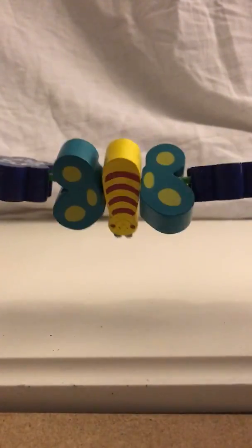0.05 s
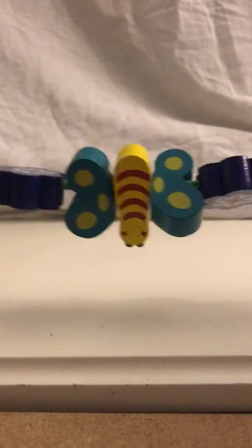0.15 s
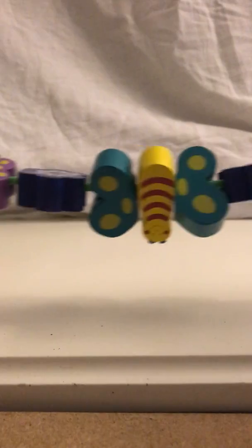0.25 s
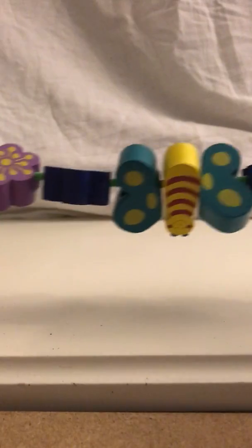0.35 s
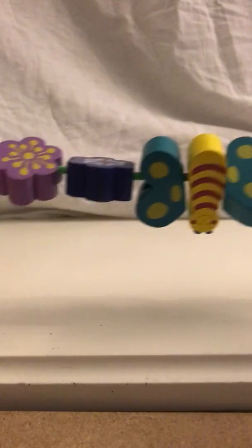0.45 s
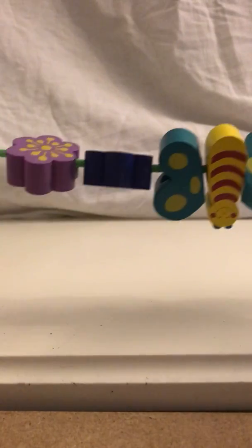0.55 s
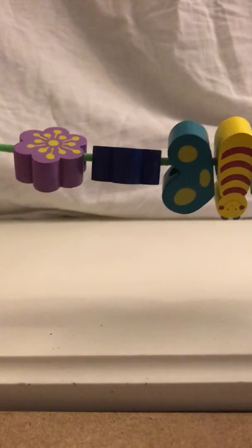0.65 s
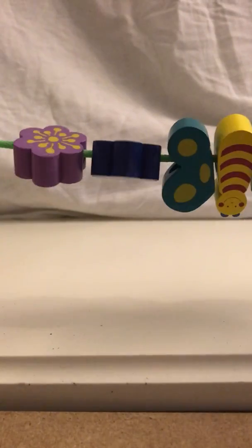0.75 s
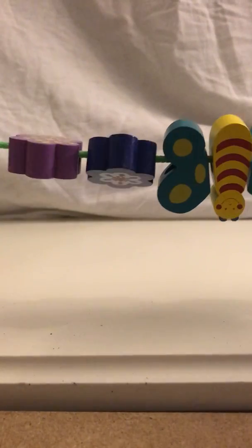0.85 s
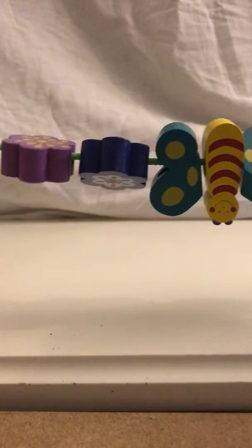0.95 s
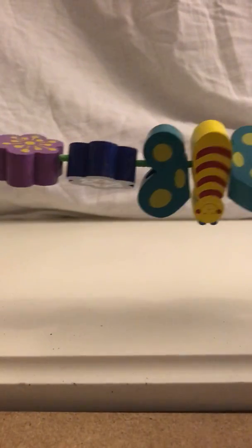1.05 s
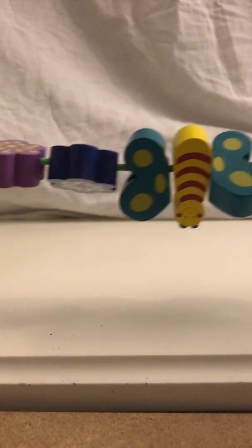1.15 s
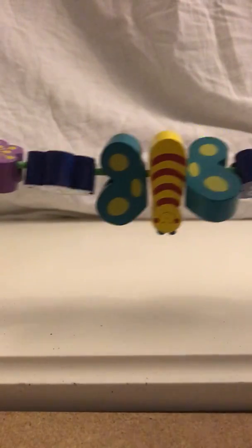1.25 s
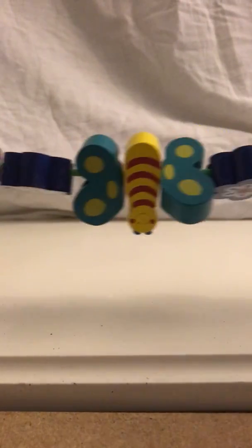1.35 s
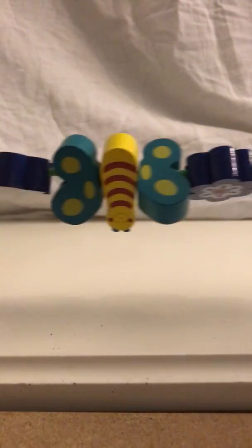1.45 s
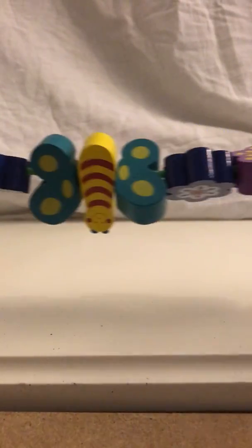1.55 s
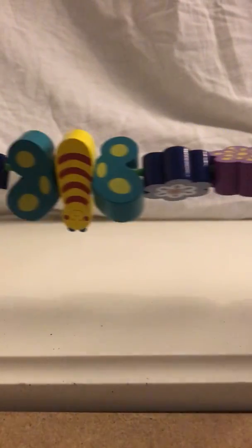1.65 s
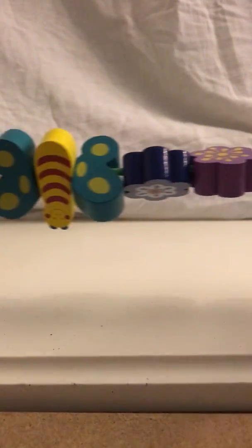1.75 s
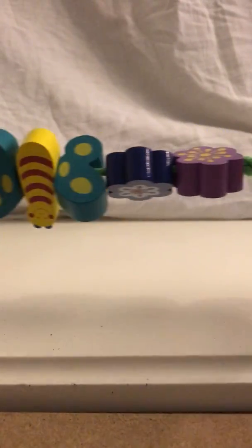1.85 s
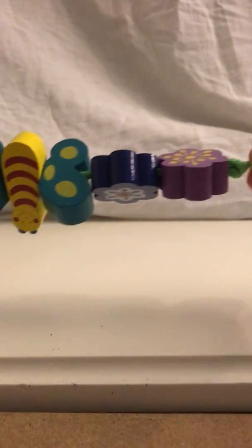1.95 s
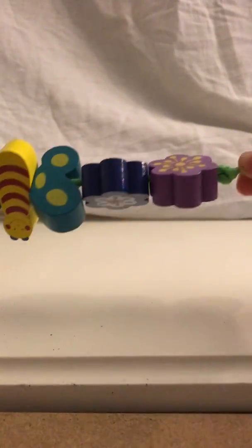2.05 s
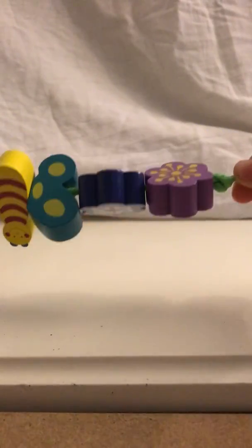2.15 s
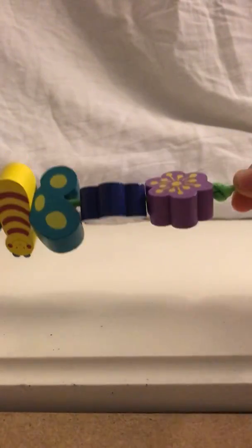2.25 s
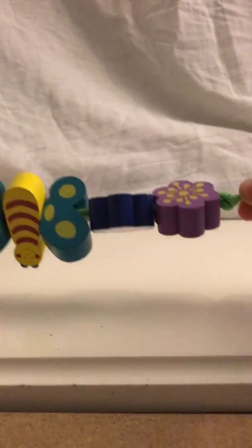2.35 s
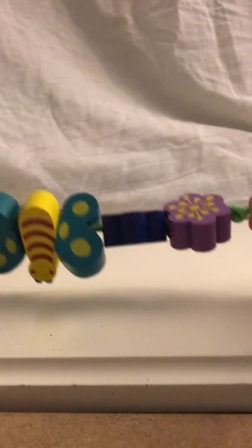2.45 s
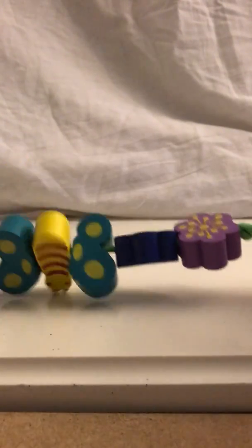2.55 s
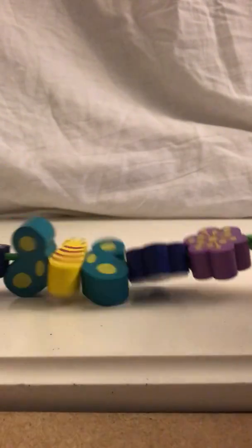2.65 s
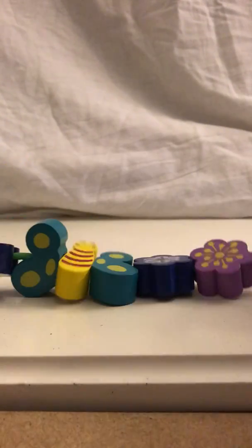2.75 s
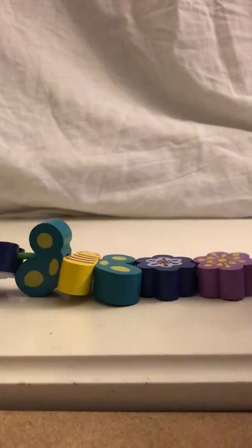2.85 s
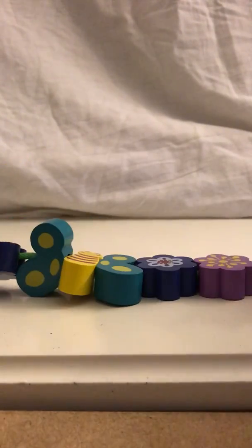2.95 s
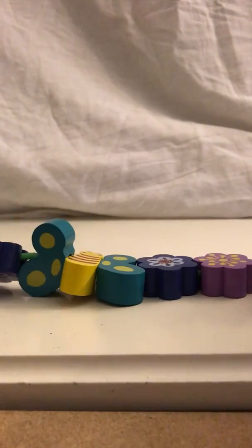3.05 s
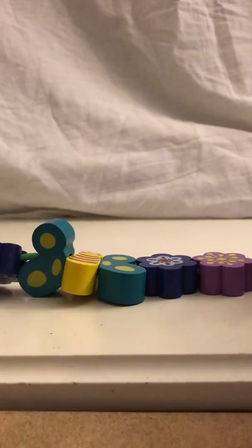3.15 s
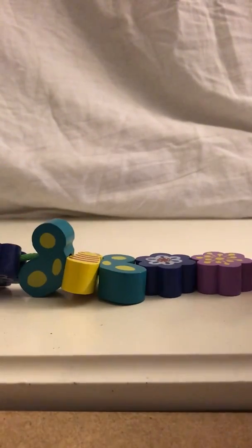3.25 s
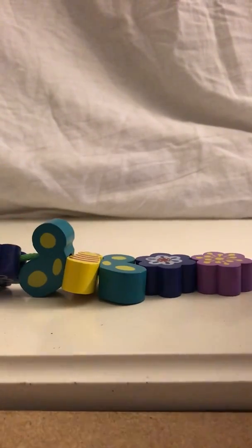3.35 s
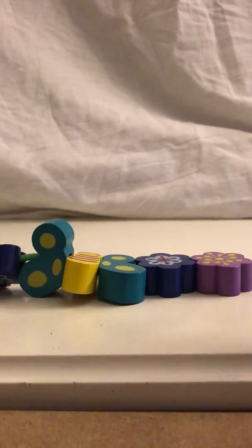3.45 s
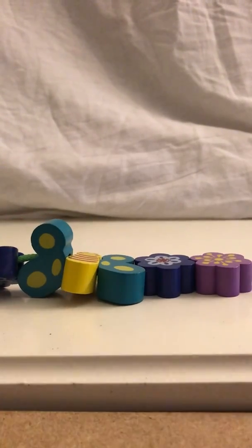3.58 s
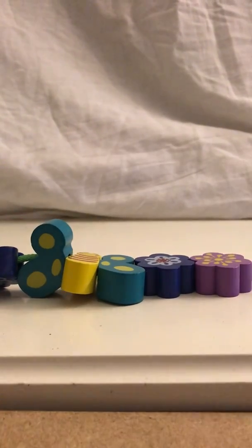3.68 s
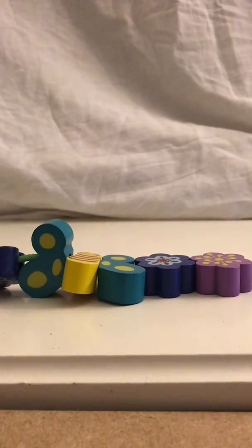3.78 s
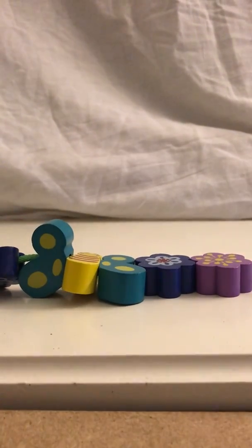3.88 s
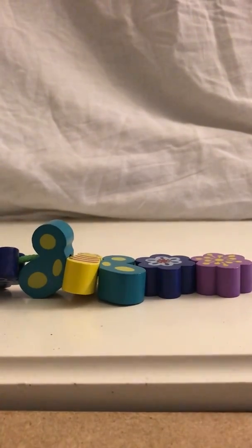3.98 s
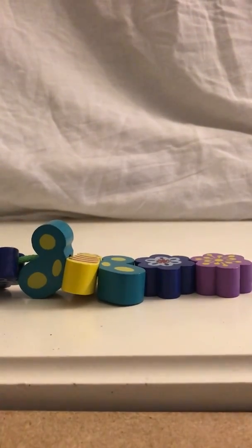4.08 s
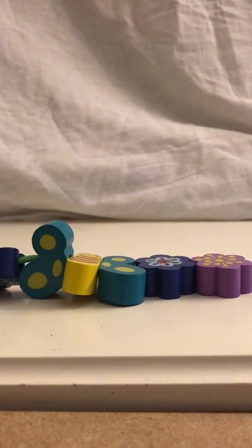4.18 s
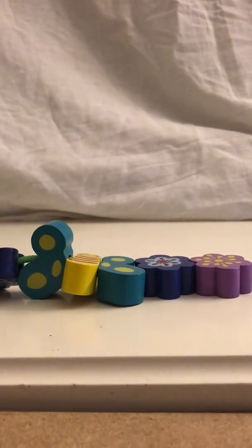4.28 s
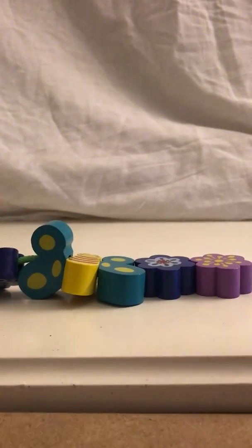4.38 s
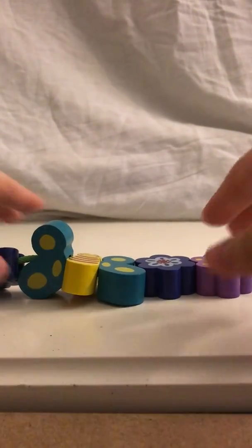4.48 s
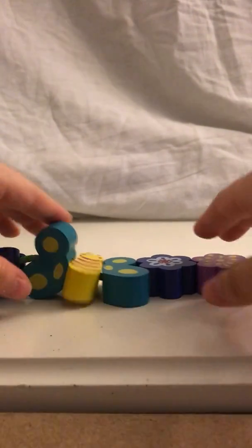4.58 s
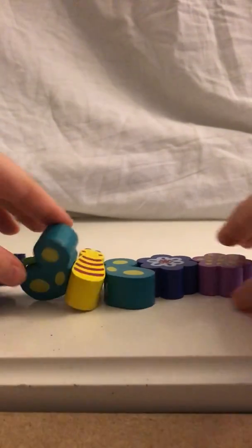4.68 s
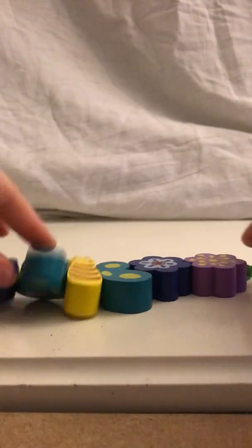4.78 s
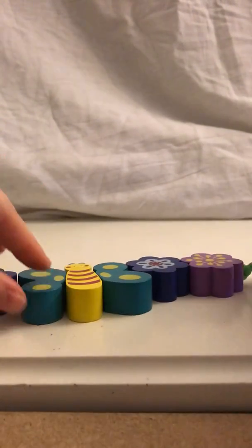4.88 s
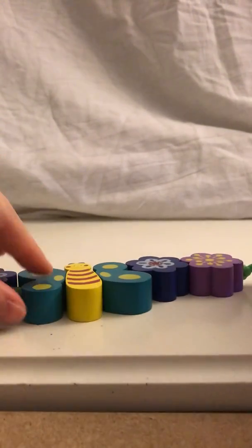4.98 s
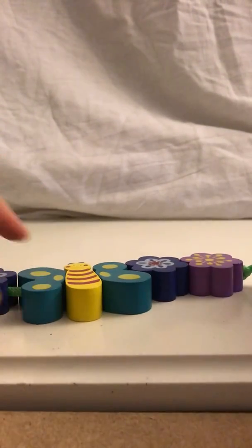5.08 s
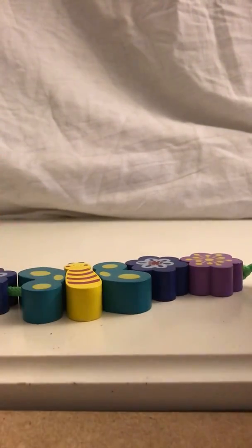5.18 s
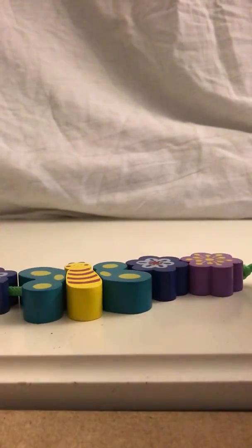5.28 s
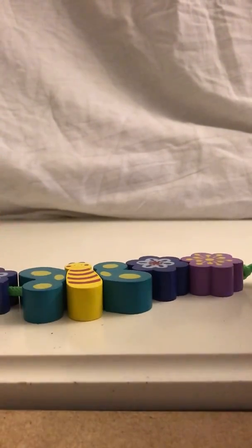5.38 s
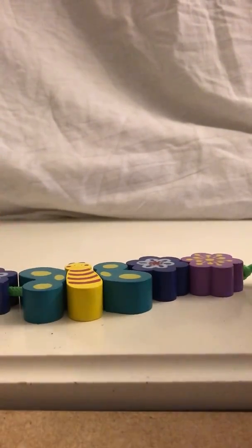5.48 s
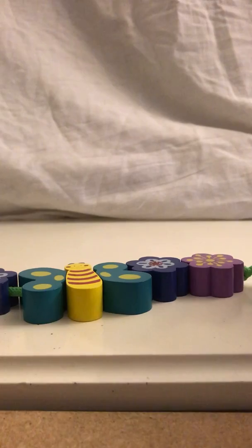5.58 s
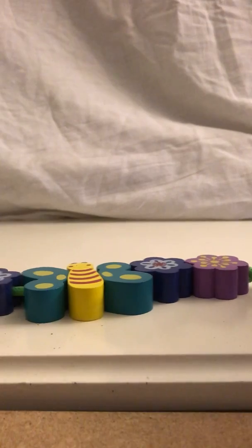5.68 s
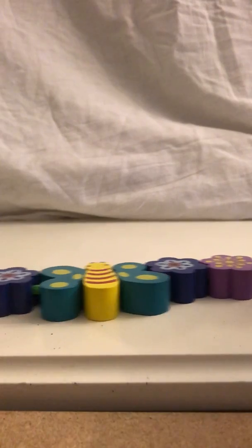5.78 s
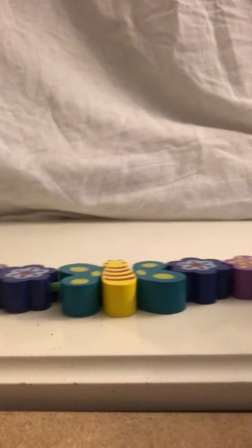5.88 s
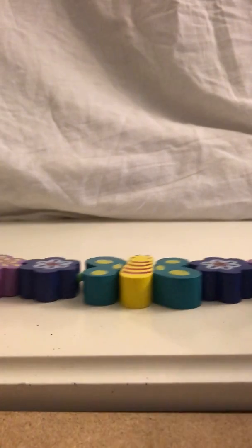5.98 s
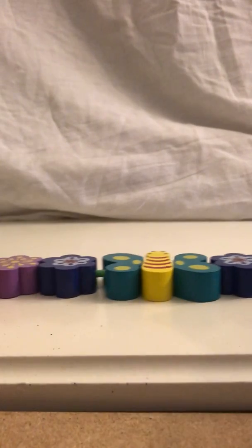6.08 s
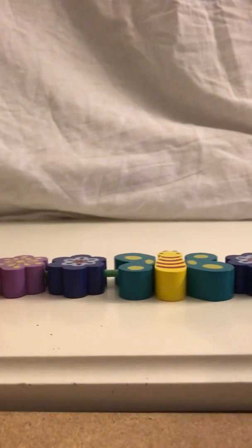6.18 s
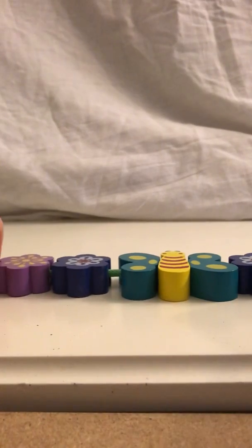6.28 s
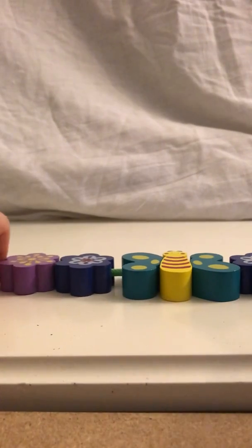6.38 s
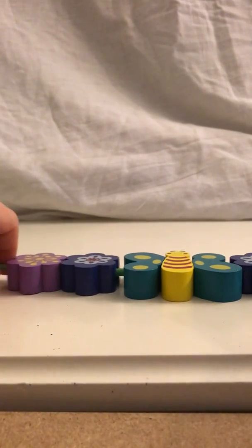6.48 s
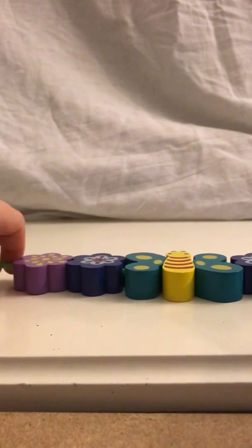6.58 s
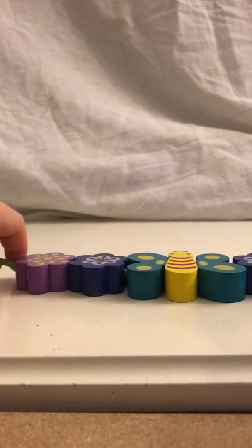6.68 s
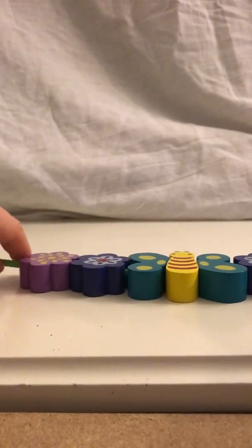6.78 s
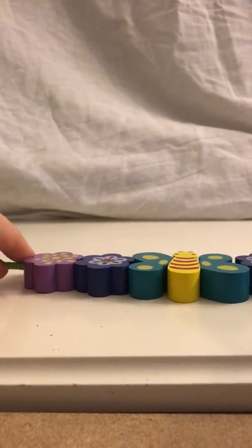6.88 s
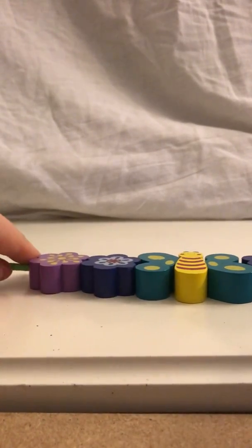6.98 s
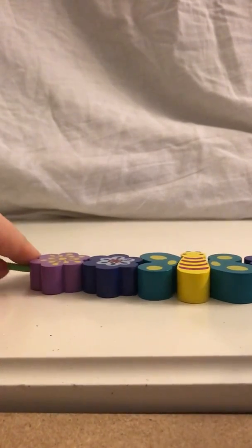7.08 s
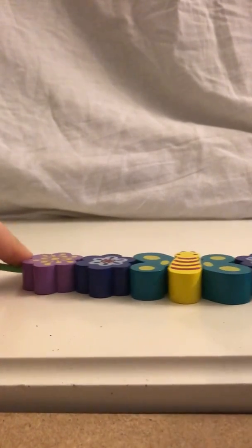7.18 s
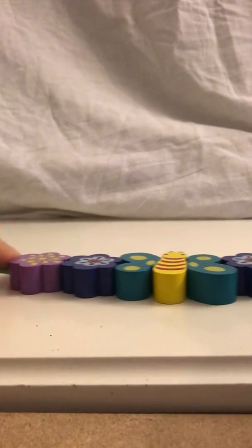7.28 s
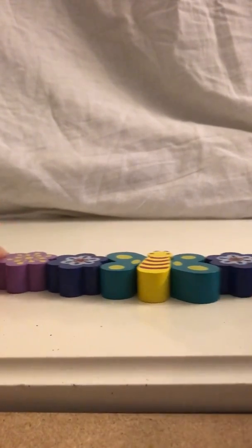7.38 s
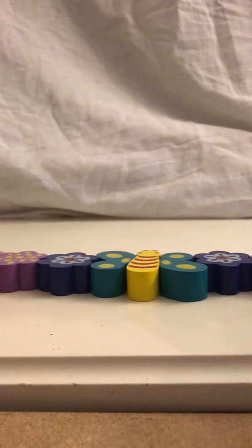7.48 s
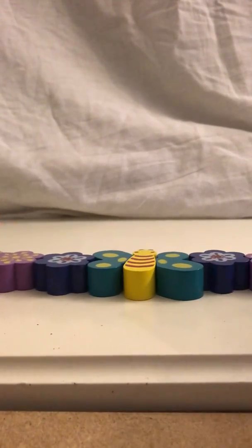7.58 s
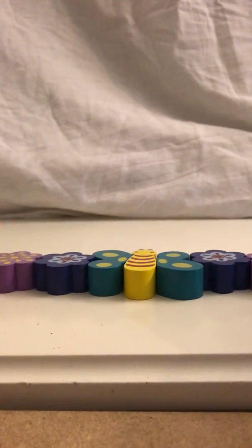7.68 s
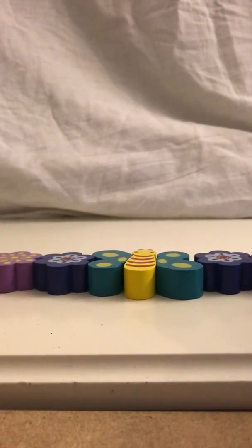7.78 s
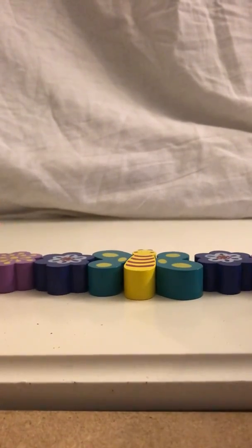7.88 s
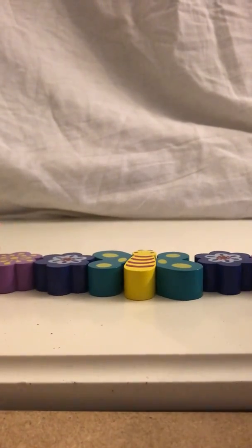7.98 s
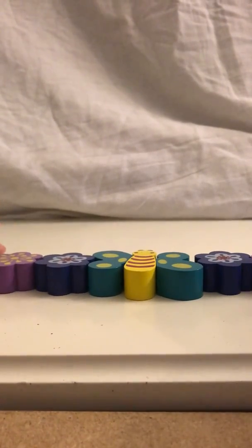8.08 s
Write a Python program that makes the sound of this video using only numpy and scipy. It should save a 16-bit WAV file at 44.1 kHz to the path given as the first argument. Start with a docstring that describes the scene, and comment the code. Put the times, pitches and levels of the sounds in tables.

```python
"""A small room: wooden beads on a cord are laid on a painted board, one tips over and clacks down,
then the string is slid along and fingered. Blows excite damped modes of board and bead (modal synthesis),
drags and brushing are filtered grainy noise, and the room answers the blows with a diffuse tail.
Behind them: swelling room rumble, a low hum that comes and goes, microphone hiss, a brighter hiss after
the loudest clack that ends abruptly, and a faint regular flicker in the treble."""
import sys
import numpy as np
from scipy import signal
from scipy.fft import rfft, irfft, next_fast_len
from scipy.io import wavfile
from scipy.ndimage import map_coordinates

SR = 44100
rng = np.random.default_rng(int(sys.argv[2]) if len(sys.argv) > 2 else 0)


def log_audio(samples):
    """Write samples as a 16-bit WAV file to the path given in sys.argv[1]."""
    # one column per channel
    frames = np.atleast_2d(samples).T
    # limit to full scale, then quantise
    limited = np.clip(frames, -1, 1)
    pcm = np.round(limited * 32767).astype(np.int16)
    wavfile.write(sys.argv[1], SR, pcm)


def voltage_ratio(level):
    """Linear amplitude factor for a level in decibels (scalar or array-like)."""
    return 10 ** (np.asarray(level, float) / 20)


N = 359018  # samples


def unit(x):
    """Normalisation: scales a signal to rms 1."""
    return x / np.sqrt(np.mean(x ** 2) + 1e-20)


def along(points, hz):
    """Linear interpolation of (f/Hz, value) points on a logarithmic frequency axis."""
    f, value = np.transpose(points)
    return np.interp(np.log(hz + 1), np.log(f + 1), value)


def curves(rows):
    """Linear interpolation in time: one curve for each column after t/s."""
    t, *columns = np.transpose(rows)
    return [np.interp(np.arange(N) / SR, t, c) for c in columns]


def wobble(rate):
    """Slow random modulation: a smooth curve through rate random knots a second."""
    knots = rng.standard_normal(int(N * rate / SR) + 4)
    return map_coordinates(knots, [np.arange(N) * rate / SR])


def filtered(x, response):
    """Linear filtering: the spectrum is multiplied by a complex response of frequency."""
    m = next_fast_len(len(x) + 8192)
    return irfft(rfft(x, m) * response(np.fft.rfftfreq(m, 1 / SR)), m)[:len(x)]


def modes(table, scatter_db=0, sign=-1):
    """Modal superposition: damped resonances (f/Hz, width/Hz, level/dB), mode k weighted by sign ** k."""
    gains = [voltage_ratio(db + scatter_db * rng.standard_normal()) for _, _, db in table]

    def response(f):
        total = 0
        for k, (gain, (centre, width, _)) in enumerate(zip(gains, table)):
            damping = 1j * f * width
            total = total + sign ** k * gain * damping / (centre * centre - f * f + damping)
        return total
    return response


def soft(response, edge_hz):
    """Contact stiffness: a rounded contact excites ever less of what lies above edge_hz."""
    return lambda f: response(f) / (1 + 1j * f / edge_hz) ** 2


def noise(response, source=None):
    """Spectral shaping: coloured noise of rms 1."""
    source = rng.standard_normal(N) if source is None else source
    return unit(filtered(source, response))


def struck(response, contact_s, rough):
    """Impulse excitation: one sharp push, and chatter falling 60 dB in contact_s, ring a body; peak 1."""
    t = np.arange(SR // 6) / SR
    chatter = voltage_ratio(-60 * t / contact_s) * rng.standard_normal(len(t))
    force = (t == 0) + rough * chatter
    ring = filtered(force, response)
    return ring / np.abs(ring).max()


def stroke(rows):
    """Envelope following: gain through (t/s, level/dB) points, zero outside them."""
    t, db = np.transpose(rows)
    return np.interp(np.arange(N) / SR, t, voltage_ratio(db), 0, 0)


def strokes(rows, attack_s, release_s, fade_db=0, axis=2):
    """Amplitude envelopes: motions rise, sag by fade_db while they last, and let go; the largest wins."""
    t, gain = np.arange(N) / SR, np.zeros(N)
    for row in rows:
        start, end = row[0], row[0] + max(row[1], 2.4 * attack_s)
        shape = np.interp(t, [start, start + attack_s, end, end + release_s], [0, 1, voltage_ratio(-fade_db), 0])
        gain = np.maximum(gain, voltage_ratio(row[axis]) * shape)
    return gain


def add(out, s, x):
    """Superposition: mixes x in from time s."""
    out[round(s * SR):][:len(x)] += x


# Reverberation time of the room: f/Hz, t60/s
REVERBERATION = [(100, .4), (500, 0.41), (2000, 0.37), (5000, 0.29), (8000, 0.16), (12000, 0.077)]


def echo(x):
    """Diffuse reverberation: a new noise tail, in which each frequency decays at its own rate."""
    hz, t, z = signal.stft(rng.standard_normal(SR // 2), SR, nperseg=256)
    decay = voltage_ratio(-60 * t / along(REVERBERATION, hz)[:, None])
    tail = signal.istft(z * decay, SR, nperseg=256)[1]
    delayed = np.pad(tail / np.linalg.norm(tail), (130, 0))  # samples before the tail begins
    return signal.fftconvolve(x, delayed)


def add_in_room(out, s, x, echo_db):
    """Direct and reverberant field: x from time s, with its tail at echo_db."""
    add(out, s, x)
    add(out, s, voltage_ratio(echo_db) * echo(x))


# Rumble spectrum: f/Hz, relative level per Hz/dB
RUMBLE_SPECTRUM = [(12, -32.5), (20, -9.5), (70, 1), (102, -11), (123, -3), (177, -13), (217, -3.5),
                   (258, -12), (296, -9), (500, -23.5), (650, -54), (1100, -120)]
# Rumble, louder while the board is handled, before a slight random wobble: t/s, rms level/dB
RUMBLE_LEVEL = [(0, -65), (1.6, -64), (2.65, -61.5), (2.75, -51.5), (2.87, -49.5), (2.99, -56.5),
                (3.22, -48), (3.6, -53), (3.87, -53), (4.08, -56.5), (4.76, -58.5), (4.88, -53), (5.1, -59),
                (5.9, -57.5), (6.5, -56), (7.44, -59.5), (7.8, -55), (8.14, -65.5)]


def rumble():
    """Low-frequency noise shaping: room rumble that swells."""
    level_db, = curves(RUMBLE_LEVEL)
    return voltage_ratio(level_db + 1.1 * wobble(8)) * noise(lambda f: voltage_ratio(along(RUMBLE_SPECTRUM, f)))


# Swells of the hum, before its random wobble: start t/s, length/s (at least 0.312 s is played), level/dB
HUM_SWELLS = [(-.1, .8, -58.5), (1.5, .45, -67), (2.82, .25, -56), (3.27, .1, -57), (3.53, .17, -50),
              (3.98, .45, -64.5), (4.6, .3, -52.5), (5.56, .16, -65), (5.9, .1, -62.5), (6.19, .12, -57),
              (6.47, .1, -59.5), (6.74, .35, -60.5), (7.5, .75, -54)]


def hum():
    """Frequency and amplitude modulation: a low sine near 69 Hz wavers in pitch and comes and goes."""
    swell = voltage_ratio(-76) + strokes(HUM_SWELLS, attack_s=0.13, release_s=0.1)  # faint between swells
    hz = 69 + 1.8 * wobble(4.4)
    return np.sin(2 * np.pi * np.cumsum(hz) / SR) * swell * voltage_ratio(2.5 * wobble(7.9))


# Hiss spectrum: f/Hz, relative level per Hz/dB
HISS_SPECTRUM = [(180, -31), (300, -5.5), (366, -9), (446, -10), (745, -10.5), (850, -11.5), (923, -11.5),
                 (1590, -12), (2180, -20.5), (2990, -20), (4820, -25.5), (9660, -30), (10500, -32.5),
                 (12600, -27), (15600, -30)]


def hiss():
    """Random noise: smooth microphone hiss with a slow, slight change of level."""
    return voltage_ratio(-68.5 + 0.98 * wobble(0.41)) * noise(lambda f: voltage_ratio(along(HISS_SPECTRUM, f)))


# Brighter hiss after the loudest clack, which stops at once: t/s, rms level/dB
BRIGHT_HISS = [(4.98, -58), (5.1, -63), (5.25, -66.5), (5.372, -66.5), (5.378, -92)]


def bright_hiss():
    """Band-limited noise: first-order slopes below 1500 Hz and above 6000 Hz."""
    band = noise(lambda f: 1j * f / (1500 + 1j * f) / (1 + 1j * f / 6000))
    return stroke(BRIGHT_HISS) * band


def flicker():
    """Periodic amplitude modulation: treble noise makes a regular, very faint tick."""
    period_s, first_s, decay_s = 0.1024, 0.0575, 0.02  # decay_s: fall by 60 dB
    since = (np.arange(N) / SR - first_s) % period_s
    return voltage_ratio(-68.5 + 2.5 * wobble(5.6) - 60 * since / decay_s) * noise(modes([(11000, 8800, 0)]))


# Fingers and cord brushing: start t/s, length/s, level at onset/dB
BRUSHES = [(5.75, 0.34, -74), (6.52, .13, -73.5), (6.72, .05, -74), (6.82, .09, -74.5), (7.17, 0.064, -75),
           (7.29, .04, -68), (7.35, 0.077, -75), (7.5, .11, -78.5), (7.72, .1, -72)]


def brush():
    """Friction noise: skin on cord makes a thin crackly rustle high up."""
    grains = rng.standard_normal(N) * voltage_ratio(6.1 * wobble(250) + 1.6 * wobble(25))
    gain = strokes(BRUSHES, attack_s=0.013, release_s=0.065, fade_db=1)
    return gain * noise(modes([(14020, 2500, -4.5), (4940, 4400, -7.5)]), grains)


# Modes of the painted board: f/Hz, width/Hz, relative level/dB
BOARD_MODES = [(470, 150, -6.5), (656, 100, -5), (890, 140, -5), (1199, 77, 1.5), (1555, 110, -0.5),
               (1734, 180, -2), (2038, 130, 0), (2500, 220, -9.5), (2900, 400, -14)]


def board(edge_hz, scatter_db=0, first=0):
    """Plate resonance: the board's modes from row first up, driven through a soft contact."""
    return soft(modes(BOARD_MODES[first:], scatter_db), edge_hz)


# Beads dragged over the paint: start t/s, length/s, rub level at onset/dB, scrape level at onset/dB
DRAGS = [(4.67, 0.042, -57.5, -62.5), (4.87, 0.046, -58, -61.5), (5.5, .1, -64, -71),
         (5.85, 0.15, -55.5, -64.5), (6.014, 0.17, -53, -54.5), (6.21, 0.1, -61.5, -75.5),
         (6.58, 0.11, -64.5, -74), (7.21, 0.061, -60.5, -77), (7.3, 0.28, -59, -70.5)]


def slides():
    """Friction excitation: the paint's grain drives the board, as a dull rub and a brighter scrape."""
    grains = rng.standard_normal((2, N)) * voltage_ratio(2.5 * wobble(400) + 0.7 * wobble(30))
    rub = noise(soft(modes([(497, 810, 0)]), edge_hz=1300), grains[0])
    upper_board, bright = board(edge_hz=4300, first=3), modes([(3300, 2000, 0)])
    scrape = noise(lambda f: upper_board(f) + voltage_ratio(-24.5) * bright(f), grains[1])
    motion = dict(attack_s=0.006, release_s=0.061, fade_db=3)
    return strokes(DRAGS, **motion) * rub + strokes(DRAGS, **motion, axis=3) * scrape


# Faint ticks of fingers, cord and beads: t/s, crack peak level/dB, crack f/Hz,
# treble drive/dB (14.5 dB is added), board peak re crack peak/dB (2.5 dB is taken off)
FAINT_TICKS = [(0.0694, -57, 3340, -23, -6), (0.2583, -50, 3630, -10, -20), (0.38, -51, 3800, -24, -21),
               (3.153, -54, 3550, -10, -8), (3.1695, -51, 4150, -14, -17),
               (4.6864, -38, 3660, -17.5, -14.5), (5.588, -34, 3040, -27, -7),
               (5.8436, -51, 4220, -13.5, 2), (6.021, -52.5, 3500, -20, 9.5),
               (6.1577, -48.5, 3420, -26, -0.5), (6.4015, -41, 5380, -21, -6),
               (6.4519, -44, 5070, -29.5, -5.5), (6.4802, -42.5, 5380, -30, -13),
               (6.4988, -43, 4100, -30, -9), (6.5145, -45.5, 5380, -33, -5.5),
               (6.5992, -49, 3380, -19.5, -1), (6.6302, -44.5, 4050, -24, -24),
               (6.6386, -47.5, 3860, -13, -21), (6.6471, -48, 3780, -26, -19),
               (6.7055, -52, 4500, -25, -17), (6.728, -54, 3740, -21, -23), (6.7363, -39.5, 5360, -15, -26),
               (6.7544, -49, 4460, -25, -18), (6.8286, -48.5, 8570, -21.5, -17),
               (6.8477, -47.5, 5770, -14.5, -10.5), (6.8982, -43.5, 8480, -27.5, -30),
               (6.9937, -51, 5660, -9, -3.5), (7.1218, -48, 6260, -18, -15),
               (7.1508, -40.5, 3800, -19, -22), (7.1894, -38.5, 3810, -25.5, -14.5),
               (7.22, -45, 3100, -18, -8), (7.2314, -49.5, 3400, -16, -20), (7.3066, -43, 5720, -17, -17),
               (7.3172, -45.5, 3460, -16, -15), (7.3657, -42, 4500, -8.5, -12),
               (7.4011, -49, 6100, -13, -8), (7.5242, -47, 5370, -20, -15), (7.562, -58, 3340, -2, -2),
               (7.5954, -45.5, 3680, -10, -17), (7.6984, -48.5, 3445, -7, -3),
               (7.735, -53, 8660, -16, -21.5), (7.7553, -51.5, 3560, -16.5, -11),
               (7.7756, -47, 3460, -12, -20.5), (7.827, -49.5, 3790, -6, -19.5)]


def ticks():
    """Weak impact: tiny cracks with a bright top, each with its own share of board sound,
    from slight to louder than the crack."""
    out = np.zeros(N + SR)
    for s, db, hz, top_db, board_db in FAINT_TICKS:
        crack = modes([(hz, hz / 1.4, 0)])
        top = modes([(14300, 3500, top_db + 14.5)])
        tick = struck(lambda f: crack(f) ** 2 + top(f), contact_s=0.0049, rough=0.29)
        upper_board = board(edge_hz=2600, scatter_db=4.0, first=3)
        wood = struck(upper_board, contact_s=0.02003, rough=0.16)
        add_in_room(out, s, voltage_ratio(db) * (tick + voltage_ratio(board_db - 2.5) * wood), echo_db=-12.5)
    return out[:N]


def rattle(count=40):
    """Random impact train: the string settles in chance touches that tend to weaken."""
    start_s, length_s, peak_db, fade_db = 2.66, 0.27, -37.5, 8.5
    when, size = rng.random((count, 2)).T
    taps = np.zeros(SR // 2)
    taps[(when * length_s * SR).astype(int)] = voltage_ratio(-fade_db * when - 6.9 * size)
    wood = board(edge_hz=2400)
    bead = soft(modes([(2750, 1100, -5)]), edge_hz=7700)  # a broad, dull bead resonance
    touches = filtered(taps, lambda f: wood(f) + bead(f))
    touches = voltage_ratio(peak_db) * touches / np.abs(touches).max()
    out = np.zeros(N + SR)
    add_in_room(out, start_s, touches, echo_db=-9)
    return out[:N]


# Beads that rebound free and ring on: t/s, peak level/dB, f/Hz
FREE_RINGS = [(4.9338, -13, 7460), (4.9425, -19.5, 7400), (4.9712, -14.5, 8260), (5.7779, -54, 5750)]


def rings():
    """Free vibration: a rebounding bead rings on in one lightly damped mode (Q 14, applied twice)."""
    out = np.zeros(N + SR)
    for s, db, hz in FREE_RINGS:
        mode = modes([(hz, hz / 14, 0)])
        ring = voltage_ratio(db) * struck(lambda f: mode(f) ** 2, contact_s=0.0031, rough=0.2)
        add_in_room(out, s, ring, echo_db=-12.5)
    return out[:N]


# Slow bending modes of the board: f/Hz, width/Hz, relative level/dB
BENDING_MODES = [(92, 26, -2), (119.7, 16, -2.5), (190.7, 18, -2.5), (325, 20, -9), (380, 40, -9),
                 (438, 85, -7.5)]


def thump(db):
    """Flexural vibration: a blow bends the whole board."""
    bending = soft(modes(BENDING_MODES, scatter_db=3.5), edge_hz=1900)
    return voltage_ratio(db) * struck(bending, contact_s=0.004, rough=0.02)


# Modes of a bead: f/Hz, width/Hz, level before a factor 0.89 more for each row/dB
BEAD_MODES = [(3300, 1000, 16.5), (3800, 340, 0), (5600, 750, 10), (7020, 100, 5), (8960, 210, 3.5),
              (12190, 1900, 7.5)]


def snap(db, hz):
    """Damped impact: a pressed bead cracks and stops at once; hard blows crack over the whole treble."""
    crack = modes([(hz, hz / 1.4, 0)])
    bead = modes(BEAD_MODES, scatter_db=3.0, sign=0.89)
    spread = voltage_ratio(1.5 + 0.35 * db)
    snapped = lambda f: (crack(f) ** 2 + spread * 1j * f / (2500 + 1j * f)) * (1 + bead(f))
    return voltage_ratio(db) * struck(snapped, contact_s=0.01, rough=0.21)


# Beads meeting the board or each other:
# t/s, board peak level/dB, snap peak level/dB, thump peak level/dB, snap f/Hz
BLOWS = [(2.6328, -22, -41, -32, 9300), (2.6588, -21.5, -40.5, -33.5, 3930), (2.6806, -23, -51, -31, 4010),
         (2.6983, -22.5, -29.5, -33.5, 4140), (2.7206, -25, -50, -37.5, 3490),
         (2.7456, -34, -60, -36, 4120), (2.783, -28.5, -43, -48, 3630), (2.8002, -25.5, -31.5, -48, 3030),
         (2.8095, -28.5, -42, -68, 3230), (2.835, -40, -37.5, -55, 4020), (2.8458, -30, -62, -58, 4180),
         (2.8646, -35, -54, -60, 3320), (2.8761, -43, -44, -63, 3300), (2.8856, -41, -40.5, -57, 3920),
         (2.8967, -43, -53, -56.5, 3250), (3.091, -44.5, -71, -61, 3850), (3.116, -44, -67, -57, 3810),
         (3.1308, -47, -59, -43, 4230), (3.2353, -45, -64, -50, 3100), (3.2669, -20.5, -15.5, -25.5, 5600),
         (3.2944, -34.5, -26.5, -53, 5540), (3.373, -44.5, -49.5, -56, 3530),
         (3.443, -47.5, -64, -53, 3770), (3.6546, -43.5, -50, -52, 3430), (3.667, -47, -52, -63, 3020),
         (4.679, -48, -55, -56.5, 3253), (4.7476, -52, -63, -56, 5290), (4.9109, -23.5, -13.5, -37.5, 4300),
         (4.916, -28, -35.5, -42, 3830), (4.9213, -33, -28, -40.5, 3940), (4.9287, -19, -4, -39, 6256),
         (4.9331, -18, -2, -29, 7547), (4.9381, -21, -14, -38.5, 3640), (4.9441, -26, -20, -33, 5000),
         (4.969, -27, -18, -45, 4340), (4.9711, -27, -10, -39.5, 6500), (5.7682, -43, -56, -48.5, 3120),
         (5.7779, -47, -51, -54, 3060)]


def knocks():
    """Impact excitation: each blow rings the board, bends it, and snaps in the bead."""
    out = np.zeros(N + SR)
    for s, board_db, snap_db, thump_db, hz in BLOWS:
        light = np.clip((-31.0 - board_db) / 12, 0, 1)  # light touches scuff instead of striking
        contact_s, rough = 0.049 + 0.0061 * light, 0.04 + 0.3525 * light
        wood = voltage_ratio(board_db) * struck(board(edge_hz=1900, scatter_db=2.5), contact_s, rough)
        add_in_room(out, s, wood + thump(thump_db), echo_db=-10)
        add_in_room(out, s, snap(snap_db, hz), echo_db=-10)
    return out[:N]


def scene():
    """Superposition of all sources at one microphone."""
    behind = rumble() + hum() + hiss() + bright_hiss() + flicker()
    handling = brush() + slides() + ticks()
    return (behind + handling + rattle() + rings() + knocks())[None]


def top_cut(x):
    """Nothing passes above the cut-off."""
    return signal.sosfilt(signal.butter(12, 16830, fs=SR, output="sos"), x)


def record(dry):
    """Band limiting: what lies above 15850 Hz is lowered by 23.5 dB."""
    kept = filtered(dry[0], lambda f: np.where(f < 15850, 1, voltage_ratio(-23.5)))
    return top_cut(kept[None])


dry = scene()
out = record(dry)
log_audio(out)
```